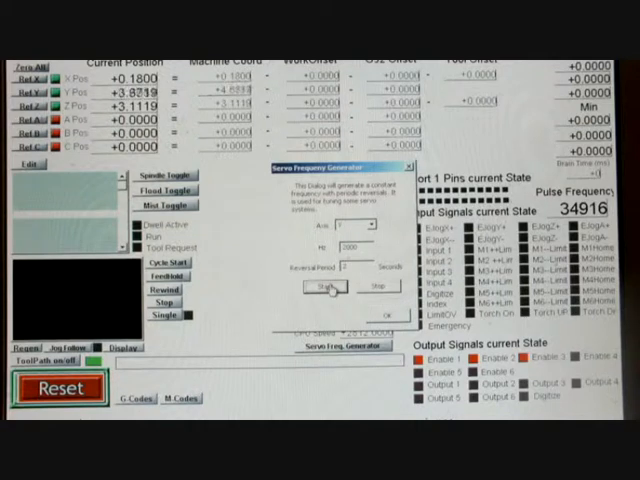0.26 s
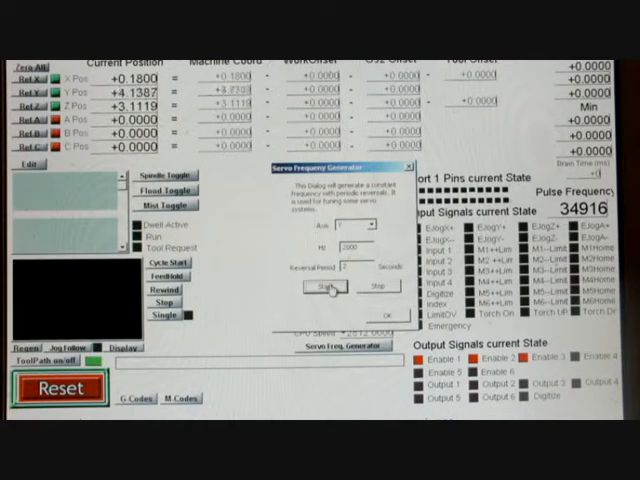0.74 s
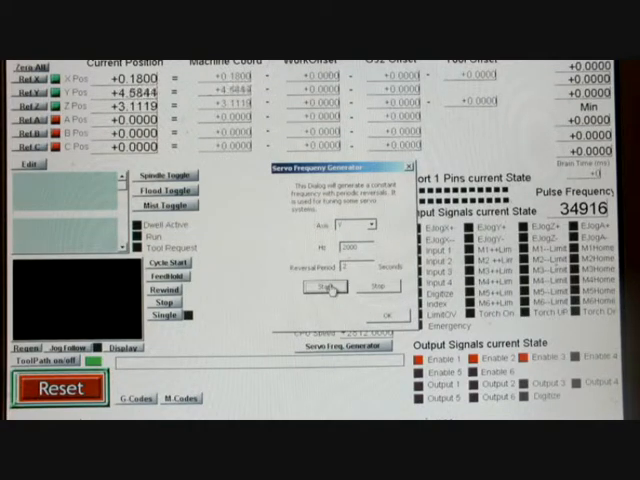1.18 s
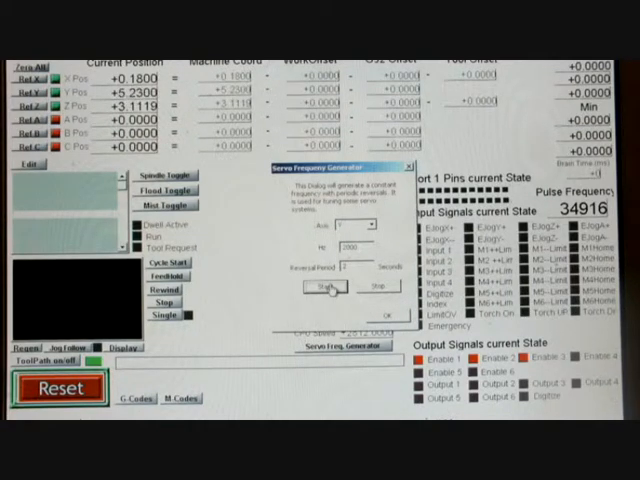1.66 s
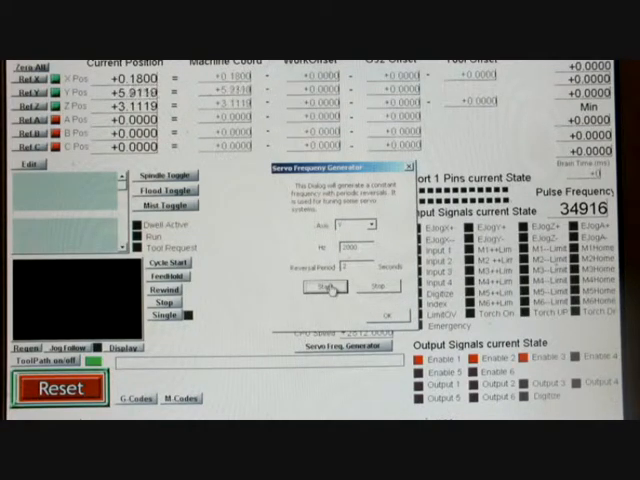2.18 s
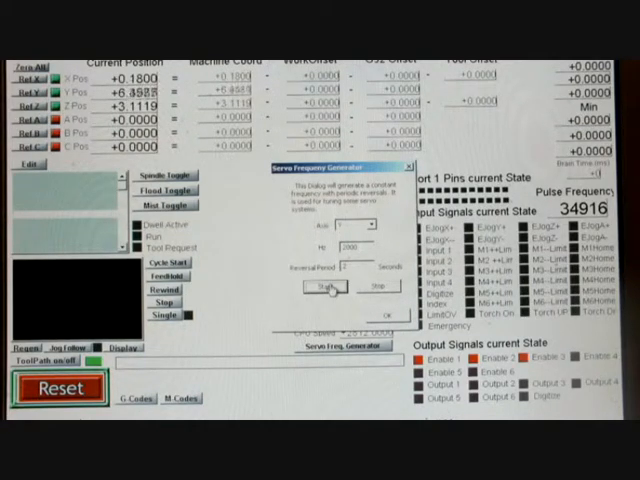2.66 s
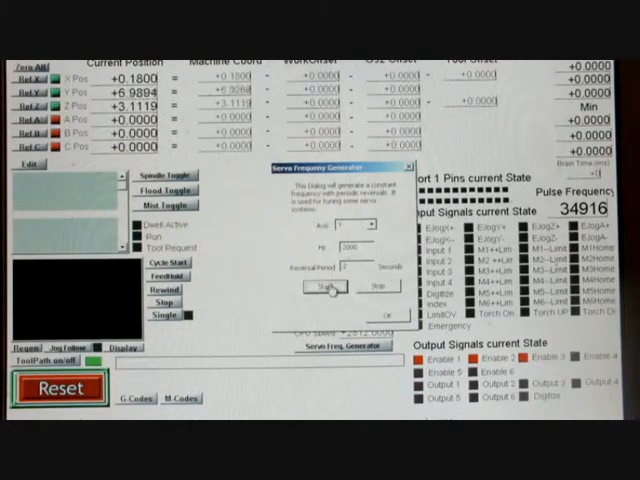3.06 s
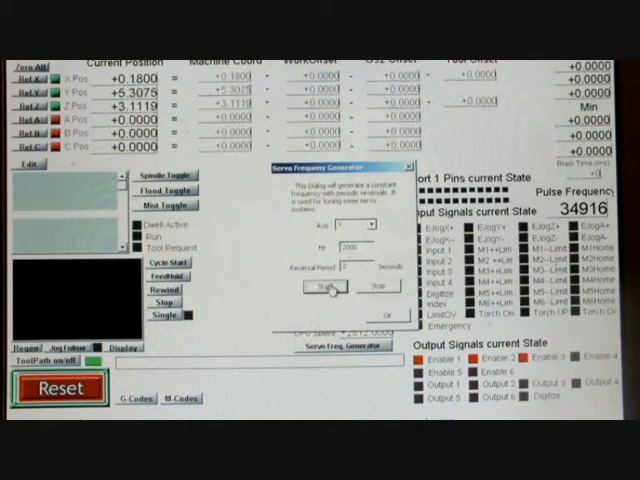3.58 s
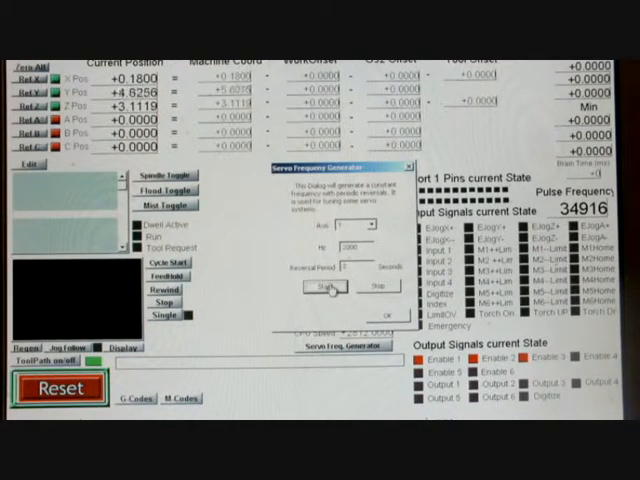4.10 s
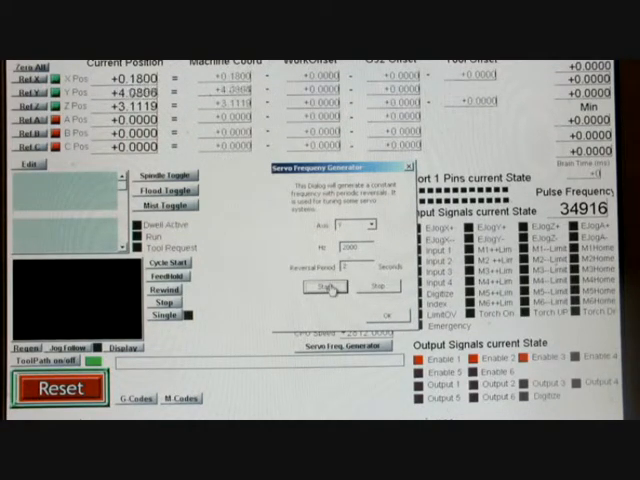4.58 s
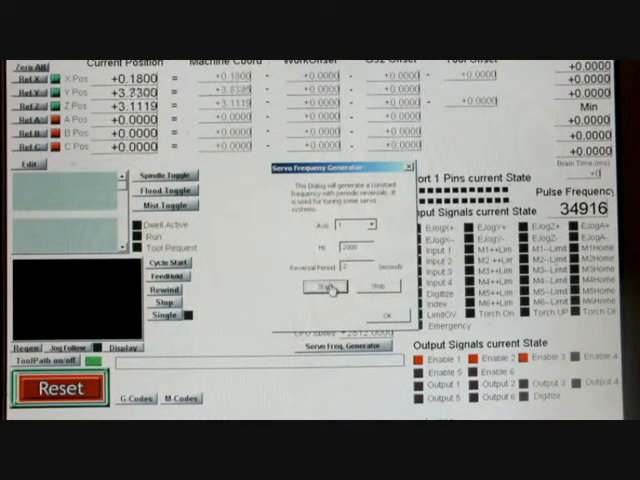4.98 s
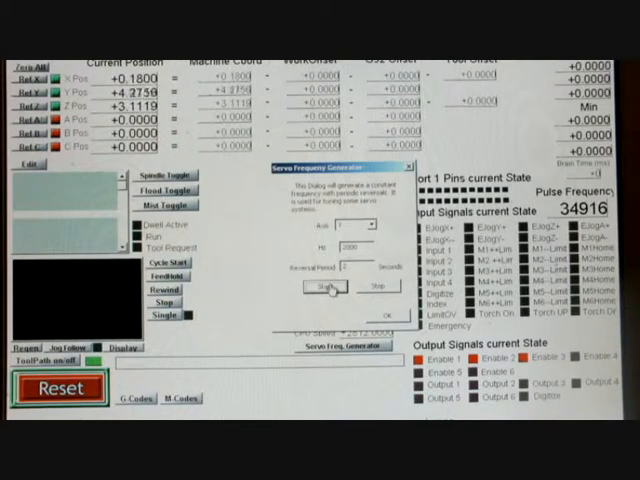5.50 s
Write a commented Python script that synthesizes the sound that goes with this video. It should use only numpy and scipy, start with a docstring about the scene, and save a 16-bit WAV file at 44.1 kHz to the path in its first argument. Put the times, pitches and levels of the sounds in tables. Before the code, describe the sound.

A brief falling squeak, then a small machine's motor drives a screw back and forth, buzzing and whirring one way, rattling harshly the other.

```python
"""A short, falling squeak opens over the chatter of a small milling machine in a workshop.
A stepper motor drives its lead screw to and fro, humming at its step rate and at multiples of it.
It reverses without a ramp: one way the screw only whirrs, the other way loose parts chatter on every step.
Tones make the hum and whines; random clicks and noise, coloured by resonances, make the rattle.
Each reversal kicks the rotor with a rasp and a thud; soft knocks and low room noise lie below."""
import sys
import numpy as np
from scipy.fft import rfft, irfft
from scipy.io import wavfile
from scipy.ndimage import uniform_filter1d

SR = 44100
rng = np.random.default_rng(int(sys.argv[2]) if len(sys.argv) > 2 else 0)


def generate_wav(signal):
    """Clip the signal to [-1, 1] and save it as 16-bit WAV at the path in sys.argv[1]."""
    frames = np.transpose(np.atleast_2d(signal))
    scaled = np.clip(frames, -1, 1) * 32767
    pcm = np.round(scaled).astype(np.int16)
    wavfile.write(sys.argv[1], SR, pcm)


N = 253218
TIME = np.arange(N) / SR                                    # seconds
FREQS = np.maximum(np.arange(N // 2 + 1) * SR / N, 1)       # Hz, kept off zero
SIDES = np.array([[1], [-1]])                               # left, right
STEP_HZ = 249.25

# The moments when the rotor turns round.
# Each row: time in seconds, level of the rasp in dB, extra step rate in Hz, depth of the stall from 0 to 1.
TURNAROUNDS = [(0.316, -30, 38, 0.95), (2.611, -29.5, 9.7, 0.4), (4.914, -29, 30.6, 0.8)]


def rotor(wobble=0.0039, wander=0.015, kick_delay_s=0.013, kick_length_s=0.009,
          shudder=0.077, shudder_delay_s=0.034, shudder_length_s=0.019):
    """Steps made so far: steady, a little shaky, racing and shuddering after each reversal."""
    catch_up_hz = sum(hz * swell(s + kick_delay_s, kick_length_s) for s, _, hz, _ in TURNAROUNDS)
    unsettled = sum(depth * swell(s + shudder_delay_s, shudder_length_s) for s, _, _, depth in TURNAROUNDS)
    steady_steps = np.cumsum(STEP_HZ + catch_up_hz) / SR
    shakiness = wobble * drift(21) + wander * drift(1.3)   # in steps
    return steady_steps + shakiness + shudder * unsettled * drift(50)


def looseness(rise, fall, delay):
    """1 while the screw runs in its chattering direction, 0 while it is pressed tight; times in seconds."""
    tight, loose, tight_again = [row[0] + delay for row in TURNAROUNDS]
    return 1 - ramp(tight, fall) + ramp(loose - rise / 2, rise) - ramp(tight_again, fall)


def travel():
    """Place of the table, 0 at the near end and 1 at the far end; it moves at one speed both ways."""
    near, far = TURNAROUNDS[0][0], TURNAROUNDS[1][0]
    return 1 - np.abs((TIME - near) / (far - near) % 2 - 1)


def grip(stall_s=0.0082, rebound=0.34, rebound_delay_s=0.041, rebound_length_s=0.0085):
    """Share of the torque that gets through: the rotor stalls turning round, then slips on the rebound."""
    share = 1
    for s, _, _, depth in TURNAROUNDS:
        dip = swell(s, stall_s) + rebound * swell(s + rebound_delay_s, rebound_length_s)
        share = share * (1 - np.clip(depth * dip, 0, 1))
    return share


# Weaker multiples of the step rate; unequal windings give half orders too.
# Each row: multiple of the step rate, starting level in dB when whirring, the same when chattering,
# side minus mid level in dB. Trim, swell and flutter are added to the levels.
WEAK_ORDERS = [(2, -53.5, -52.5, 1), (3.5, -60, -58, 6), (6, -49.5, -59, 4), (7, -61, -46, 7.5),
               (8, -54, -41, 3.5), (9, -46, -46, 1), (11, -54, -43.5, 5.5), (12, -64, -62, 6),
               (13, -52.5, -48, 4), (14, -74, -40, -15), (14.5, -55, -47, -4), (15, -62, -43, -1),
               (16, -63, -41, 2), (19, -64, -41.5, -18), (23, -71, -46.5, -23), (32, -91, -44, -8)]


def motor(steps, loose, place, effort_db, trim_db=-1.9, flutter_db=2.5, shake=0.085, follow=0.3):
    """Torque ripple sings at multiples of the step rate and drops out as the rotor turns round."""
    out = hum(steps, place) + whines(steps, loose, place)
    # the weaker orders swell with the rattle
    swell_db = follow * (effort_db - 10 * loose)
    # they need a moment to build up once the screw is loose
    ringing_up = looseness(rise=0.091, fall=0.037, delay=0.022)
    for order, tight_db, loose_db, side_db in WEAK_ORDERS:
        own_flutter_db = flutter_db * (drift(16) - 0.4)
        level_db = by_direction((tight_db, loose_db), ringing_up) + trim_db + swell_db
        level_db = level_db + flare(order) + own_flutter_db
        out = out + from_db(level_db) * tone(order * steps + shake * drift(33), side_db)
    return out * grip()


# Hum at the step rate with the table at the near end: level in dB when whirring, when chattering.
HUM_NEAR_DB = (-31.5, -35.5)
# Change of the hum at the far end: dB when whirring, dB when chattering.
HUM_CHANGE_FAR_DB = (-1, -3)


def hum(steps, place, waver_db=0.46, loose_waver_db=0.56):
    """The tight screw carries the step rate into the frame; once it is loose the hum dies back slowly."""
    loose = looseness(rise=0.33, fall=0.034, delay=0.046)
    level_db = by_direction(HUM_NEAR_DB, loose) + place * by_direction(HUM_CHANGE_FAR_DB, loose)
    level_db = level_db + (waver_db + loose_waver_db * loose) * drift(39)
    return from_db(level_db) * tone(steps, at_hz(MIC_WIDTH, STEP_HZ))


# The strong whines, with the table at the near end.
# Each row: multiple of the step rate, level in dB when whirring, level in dB when chattering, flutter in dB.
STRONG_WHINES = [(3, -42.5, -46, 1.5), (4, -49, -47.5, 1.95), (5, -44.5, -44.5, 2.2)]


def whines(steps, loose, place, far_db=-2.5, shake=0.008):
    """Three low multiples of the step rate flutter and take turns to sing out."""
    out = 0
    for order, tight_db, loose_db, flutter_db in STRONG_WHINES:
        level_db = by_direction((tight_db, loose_db), loose) + far_db * place
        level_db = level_db + flare(order) + flutter_db * drift(24)
        side_db = at_hz(MIC_WIDTH, order * STEP_HZ)
        out = out + from_db(level_db) * tone(order * steps + shake * drift(20), side_db)
    return out


# One multiple of the step rate sings out or sinks for a moment.
# Each row: middle in seconds, multiple of the step rate, change in dB, length in seconds.
ORDER_FLARES = [(0.06, 3, -9, 0.07), (0.088, 4, 6, 0.026), (0.21, 4, 11.5, 0.072), (0.26, 16, 10, 0.016),
                (2.68, 4, 17.5, 0.055), (2.7, 5, 5, 0.08), (2.722, 3, 5.5, 0.12), (2.95, 14, -16, 0.057),
                (3.015, 5, 10, 0.084), (3.1, 4, 12.5, 0.035), (3.22, 4, 12, 0.024), (3.232, 5, 7, 0.029),
                (3.352, 5, 9, 0.025), (3.29, 3, 6, 0.13), (3.445, 5, 6.5, 0.027), (3.583, 5, 9, 0.064),
                (3.52, 16, 6, 0.05), (3.65, 14, 5.5, 0.4), (3.62, 4, 17.5, 0.016), (3.732, 4, 7, 0.054),
                (3.95, 3, 7, 0.26), (3.99, 4, 12.5, 0.082), (4.103, 14, -13, 0.056), (4.128, 4, 10, 0.029),
                (4.403, 3, -12, 0.051), (4.427, 16, 10, 0.032), (4.42, 4, 12, 0.027), (4.53, 4, 10, 0.038),
                (4.52, 5, 3.5, 0.08), (4.777, 4, 14.5, 0.046), (4.834, 3, 4, 0.06), (4.87, 4, 15, 0.028),
                (5.517, 5, 5.5, 0.042)]


def flare(order):
    """Rise and fall in dB of one multiple of the step rate."""
    return sum(db * swell(s, length) for s, k, db, length in ORDER_FLARES if k == order)


# Strength of the rattle at the near end: dB when whirring, dB when chattering, before any surges.
EFFORT_NEAR_DB = (0.47, 9.5)
# Change of that strength at the far end: dB when whirring, dB when chattering.
EFFORT_CHANGE_FAR_DB = (-1.5, -1.5)
# Moments when the rattle surges or eases.
# Each row: middle in seconds, change in dB, length in seconds.
RATTLE_SURGES = [(0.12, -1, 0.044), (0.27, 0.5, 0.015), (0.76, 2, 0.047), (1.005, 2.5, 0.25),
                 (1.637, -2.5, 0.057), (2.3, 2.1, 0.078), (2.729, 6, 0.026), (2.806, 3, 0.019),
                 (3.02, -3, 0.012), (3.172, 2.5, 0.064), (3.65, 3.5, 0.2), (3.736, 2.5, 0.018),
                 (3.876, -1.5, 0.022), (4.255, 2, 0.19), (5.42, 2, 0.43)]


def effort(loose, place):
    """Strength of the rattle in dB: set by direction, fading with distance, surging and easing at listed moments."""
    surges = sum(db * swell(s, length) for s, db, length in RATTLE_SURGES)
    return by_direction(EFFORT_NEAR_DB, loose) + place * by_direction(EFFORT_CHANGE_FAR_DB, loose) + surges


# Colour of the rattle when the screw is tight. Each row: frequency in Hz, relative level in dB.
WHIRR_COLOUR = [(600, -5), (1000, -5), (1300, 0), (2100, -2), (2800, -6.5), (4600, 0.5), (6000, -3.5),
                (7500, -9.5), (9000, -9.5), (9700, -13), (11000, -15), (12400, -39)]
# Colour of the rattle when the screw is loose. Each row: frequency in Hz, relative level in dB.
CHATTER_COLOUR = [(600, -11), (1100, -4), (1350, -2), (1600, -3), (2200, -5.5), (3000, -5.5), (3700, -1.5),
                  (4700, 2.5), (5700, 0.6), (7000, -5), (8700, -5.5), (10300, -9.5), (11100, -19.5),
                  (11700, -17.5), (12600, -17)]
# Resonances of the frame and screw. Each row: frequency in Hz, width in Hz, lift in dB.
FRAME_MODES = [(789, 10, 9.5), (861, 5.7, 6.5), (2050, 6.9, 5), (2190, 170, 7.5), (2463, 205, 6.5),
               (3300, 140, 2.5), (3720, 110, 5), (3895, 54, 4), (4093, 190, 6.5), (4690, 86, 2.5),
               (5860, 77, 1.5), (7870, 290, 8.5), (10330, 115, 8), (11520, 300, 10.5)]


def rattle(steps, loose, effort_db, frame_db=-36.5, frame_follow=0.43, whirr_db=-38.5, chatter_db=-38,
           throb=0.08, flicker_db=0.87, split_hz=2950):
    """Contacts ring the frame's low modes and the screw's bright ones; stronger rattling is brighter."""
    modes = 1 + sum((from_db(db) - 1) * np.abs(resonance(hz, width)) ** 2 for hz, width, db in FRAME_MODES)
    modes = modes * ringing() / np.sqrt(1 + (600 / FREQS) ** 8)   # small parts radiate no bass
    low_share = 1 / (1 + (FREQS / split_hz) ** 16)
    # the tight screw throbs once in six steps
    throbbing = 1 + throb * np.sin(2 * np.pi * steps / 6)
    whirr = contacts(steps, per_s=6000, bunching=0.2, spread_db=3.5, wash=1) * throbbing
    chatter = contacts(steps, per_s=3500, bunching=0.27, spread_db=1, wash=1)
    directions = [(whirr, WHIRR_COLOUR, 1 - loose, whirr_db), (chatter, CHATTER_COLOUR, loose, chatter_db)]
    low, bright = 0, 0
    for force, spectrum, share, level_db in directions:
        colour = modes * from_db(at_hz(spectrum, FREQS))
        frame_gain = from_db(frame_db + frame_follow * effort_db)
        metal_gain = from_db(level_db + effort_db + flicker_db * drift(14))
        weight = np.sqrt(np.clip(share, 0, 1))
        low = low + weight * frame_gain * radiate(force, colour * np.sqrt(low_share))
        bright = bright + weight * metal_gain * radiate(force, colour * np.sqrt(1 - low_share))
    return low + patchy(bright, patchy_db=1.03, rate_hz=17)


def contacts(steps, per_s, bunching, spread_db, wash):
    """Tiny metal contacts, bunched on each step, over an even wash of noise."""
    chance = per_s / SR * (1 + bunching * np.cos(2 * np.pi * steps))
    hits = rng.random(N) < chance
    strengths = rng.choice([-1, 1], N) * from_db(spread_db * rng.standard_normal(N))
    return rms_one(hits * strengths) + wash * rng.standard_normal(N)


def ringing(tail=0.53, t60_s=0.17):
    """Response of a contact followed by the ring of the machine's countless small modes."""
    ring = rng.standard_normal(N) * from_db(-60 * np.minimum(TIME / t60_s, 4))
    return 1 + tail * rfft(ring / np.linalg.norm(ring))


def patchy(x, patchy_db, rate_hz):
    """Bands a third of an octave apart in the treble surge and ease, each on its own."""
    centres_hz = np.geomspace(3200, 12500, 7)
    spectrum = rfft(x)
    out = 0
    for band in np.eye(len(centres_hz)):
        band_sound = irfft(spectrum * np.interp(FREQS, centres_hz, band), N)
        out = out + from_db(patchy_db * drift(rate_hz)) * band_sound
    return out


def jolts(rasp_length_s=0.0083, thud_db=-17, thud_length_s=0.035):
    """Backlash slams across at each reversal: a short bright rasp and a soft thud in the frame."""
    def envelope(length_s):
        """One burst at each reversal."""
        return sum(from_db(db) * swell(s, length_s) for s, db, _, _ in TURNAROUNDS)
    rasp_colour = np.abs(resonance(8900, 3400)) ** 2 + np.abs(resonance(2600, 650))
    rasp = radiate(rng.standard_normal(N), rasp_colour)
    thud = radiate(rng.standard_normal(N), resonance(360, 520) ** 2)
    return envelope(rasp_length_s) * rasp + from_db(thud_db) * envelope(thud_length_s) * thud


SQUEAK_S, SQUEAK_DB = 0.01, -26   # time of full level, and that level before the roughness
SQUEAK_ATTACK_S, SQUEAK_HOLD_S, SQUEAK_RELEASE_S = 0.024, 0.04, 0.075
SQUEAK_START_HZ, SQUEAK_END_HZ, SQUEAK_SAG_S = 5200, 4750, 0.0292   # its pitch sags and settles
SQUEAK_FADE_DB_PER_S = 55


def squeak(roughness=0.45):
    """Dry metal sticks and slips once, in a rough, falling tone that fades."""
    hz = SQUEAK_END_HZ + (SQUEAK_START_HZ - SQUEAK_END_HZ) * np.exp(-TIME / SQUEAK_SAG_S)
    attack = ramp(SQUEAK_S - SQUEAK_ATTACK_S, SQUEAK_ATTACK_S)
    release = ramp(SQUEAK_S + SQUEAK_HOLD_S, SQUEAK_RELEASE_S)
    level_db = SQUEAK_DB - SQUEAK_FADE_DB_PER_S * np.maximum(TIME - SQUEAK_S, 0)
    turns = np.cumsum(hz + 70 * drift(200)) / SR
    slips = from_db(3 * drift(90)) + roughness * drift(450)
    return (attack - release) * from_db(level_db) * slips * tone(turns, side_db=-12)


# Soft knocks.
# Each row: time in seconds, peak level in dB, frequency in Hz above which the soft contact fades.
SOFT_KNOCKS = [(0.713, -36, 100), (0.724, -24.5, 1500), (0.735, -31, 200), (0.744, -24, 450),
               (1.256, -27.5, 1097), (1.431, -33.5, 70), (1.449, -43, 70)]
# What the knocks ring with. Each row: frequency in Hz, width in Hz, relative level in dB.
KNOCK_RESONANCES = [(198, 83, 6.5), (352, 185, 0), (504, 350, -2), (910, 430, -1)]


def knocks(tail=0.55, ring_s=0.26, bass_edge_hz=125):
    """Soft contacts thump a few low, well damped modes; the small body radiates no deep bass."""
    body = sum(from_db(db) * resonance(hz, width) ** 2 for hz, width, db in KNOCK_RESONANCES)
    body = body * ringing(tail=tail, t60_s=ring_s)
    body = body / (1 + bass_edge_hz / (1j * FREQS)) ** 4
    out = 0
    for s, db, soft_hz in SOFT_KNOCKS:
        delay = np.exp(-2j * np.pi * FREQS * s)   # moves the thump to its time
        thump = irfft(body * delay / (1 + 1j * FREQS / soft_hz) ** 2, N)
        out = out + from_db(db) * thump / np.abs(thump).max()
    return out


# Faint tones between the step orders, from the uneven turning of rotor and screw.
# Each row: frequency in Hz, level in dB around which it wavers.
FAINT_TONES = [(124.6, -69.5), (290.8, -55), (398.8, -52), (436, -58.5), (561, -58), (798, -58)]


def undertones():
    """The turning parts add faint, nearly steady tones."""
    out = 0
    for hz, db in FAINT_TONES:
        turns = hz * TIME + 0.089 * drift(1.4)
        out = out + from_db(db + 1.4 * drift(2.9)) * tone(turns, at_hz(MIC_WIDTH, hz))
    return out


# The motor driver's thin whistle: frequency in Hz, level in dB around which it wavers.
DRIVER_WHISTLE = (12000, -61.5)


def driver():
    """The current chopper whistles faintly."""
    hz, level_db = DRIVER_WHISTLE
    turns = hz * TIME + 0.18 * drift(30)
    return from_db(level_db + 2.5 * drift(16)) * tone(turns, at_hz(MIC_WIDTH, hz))


# Colour of the low workshop noise. Each row: frequency in Hz, relative level in dB.
ROOM_COLOUR = [(20, -16), (60, -12), (100, -11), (140, -6), (200, -3), (300, 0), (450, 8), (620, -2.5),
               (900, 0), (2000, -19)]


def workshop(level_db=-46.5):
    """Low room noise: random noise given the colour of the room."""
    return from_db(level_db) * radiate(rng.standard_normal(N), from_db(at_hz(ROOM_COLOUR, FREQS)))


# How differently the two microphones hear. Each row: frequency in Hz, side minus mid level in dB.
MIC_WIDTH = [(60, -4), (110, 0.5), (230, -24.5), (400, -15), (500, -8), (750, -8.5), (1200, -4),
             (2200, -1.5), (3900, 1), (4700, -7), (5400, -28.5), (13000, -28.5)]


def radiate(force, colour):
    """Colour a force; its diffuse reflections differ between the microphones. Mid rms 1."""
    strength = np.sqrt(np.abs(uniform_filter1d(force ** 2, size=600)))
    mid = irfft(rfft(force) * colour, N)
    reflections = rfft(strength * rng.standard_normal(N))
    side = irfft(reflections * colour * from_db(at_hz(MIC_WIDTH, FREQS)), N)
    return (mid + SIDES * side) / np.std(mid)


def tone(turns, side_db):
    """A partial of mid rms 1; standing waves shift its phase between the microphones."""
    angle = 2 * np.pi * (turns + rng.random())
    return np.sqrt(2) * (np.sin(angle) - SIDES * from_db(side_db) * np.cos(angle))


def resonance(hz, width_hz):
    """Response of one mode, 1 on top."""
    return 1 / (1 + 1j * (FREQS ** 2 - hz ** 2) / (FREQS * width_hz))


def drift(rate_hz):
    """Random wavering with spread 1; changes much faster than the rate are weak."""
    white = rfft(rng.standard_normal(16384))
    slow = rms_one(irfft(white / (1 + (FREQS[:len(white)] / rate_hz) ** 2)))
    return np.interp(TIME, np.linspace(0, N / SR, len(slow)), slow)


def swell(s, length):
    """A bell-shaped rise and fall around time s."""
    return np.exp(-0.5 * ((TIME - s) / length) ** 2)


def ramp(s, length):
    """Rises evenly from 0 to 1, starting at time s."""
    return np.clip((TIME - s) / length, 0, 1)


def by_direction(pair, loose):
    """Blend a whirring value and a chattering value."""
    return pair[0] + (pair[1] - pair[0]) * loose


def at_hz(points, hz):
    """Read a table on a log-frequency axis."""
    f, value = np.transpose(points)
    return np.interp(np.log(hz), np.log(f), value)


def from_db(db):
    """Decibels to gain."""
    return 10 ** (np.asarray(db) / 20)


def rms_one(x):
    """Scale to unit rms."""
    return x / np.sqrt(np.mean(x ** 2) + 1e-20)


def scene():
    """Direction and place of the table drive motor and rattle; the other sounds are added."""
    steps, place = rotor(), travel()
    loose = looseness(rise=0.019, fall=0.12, delay=0.003)
    effort_db = effort(loose, place)
    machine = motor(steps, loose, place, effort_db) + rattle(steps, loose, effort_db)
    accents = jolts() + squeak() + knocks()
    return machine + accents + undertones() + driver() + workshop()


# Difference in colour between the microphones. Each row: frequency in Hz, left minus right level in dB.
MIC_LEAN = [(300, 0.36), (1000, 0.5), (2200, -2), (3500, -2), (4600, 0.5), (7000, 0.14)]


def record(dry, cutoff_hz=13450):
    """The two microphones differ a little in colour; the top is cut steeply."""
    lean = from_db(SIDES * at_hz(MIC_LEAN, FREQS) / 2)
    cut = 1 / np.sqrt(1 + (FREQS / cutoff_hz) ** 240)
    return irfft(rfft(dry) * lean * cut, N)


dry = scene()
out = record(dry)
generate_wav(out)
```